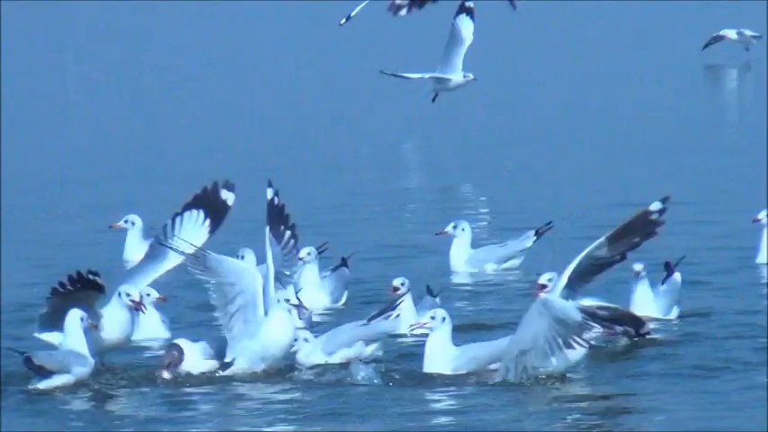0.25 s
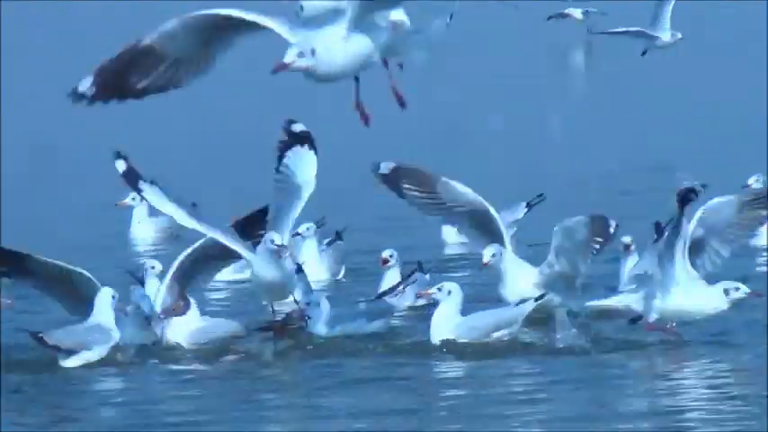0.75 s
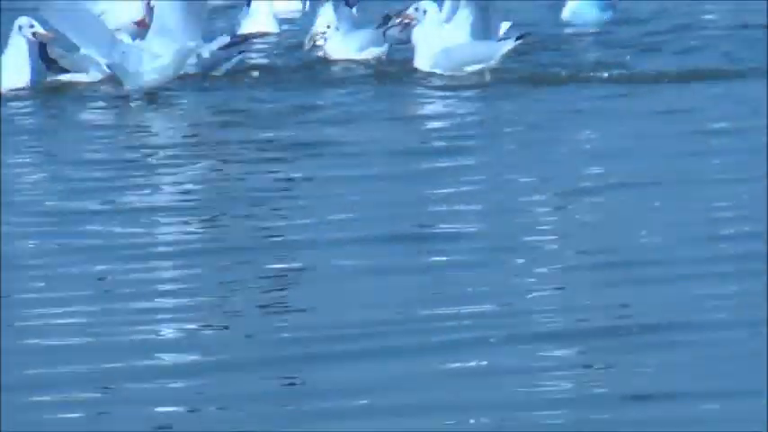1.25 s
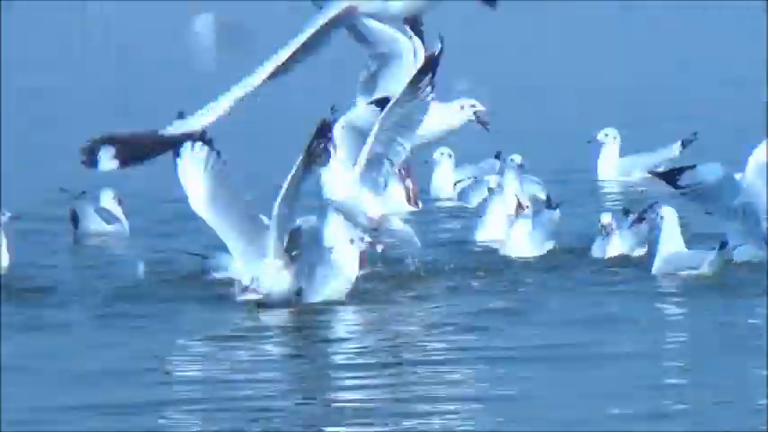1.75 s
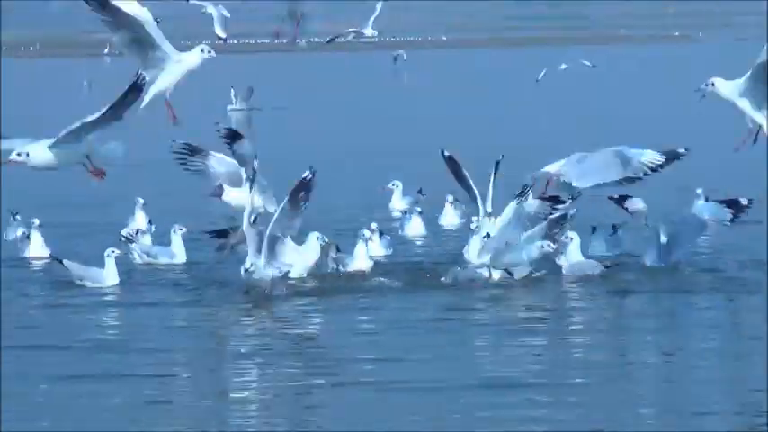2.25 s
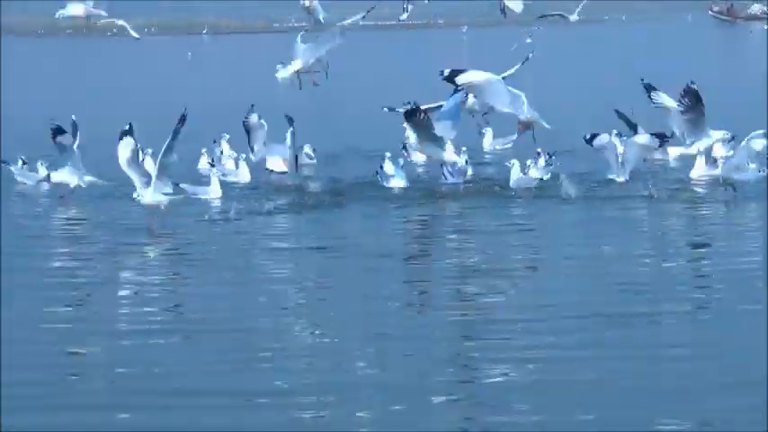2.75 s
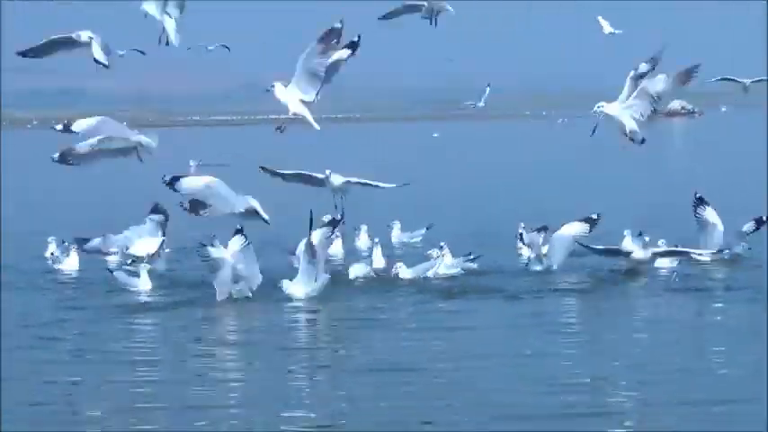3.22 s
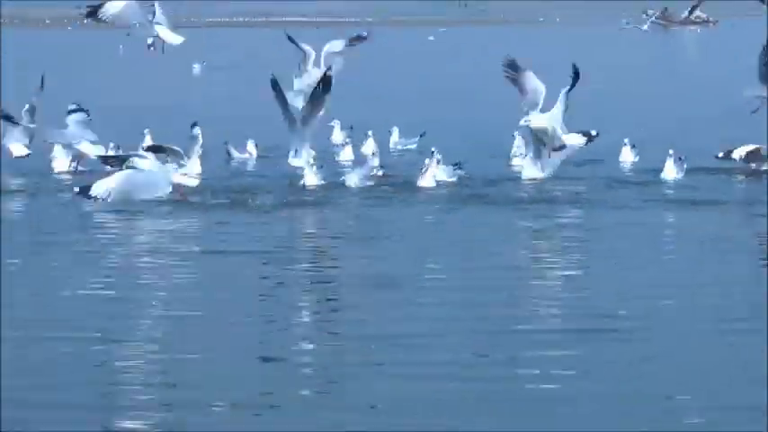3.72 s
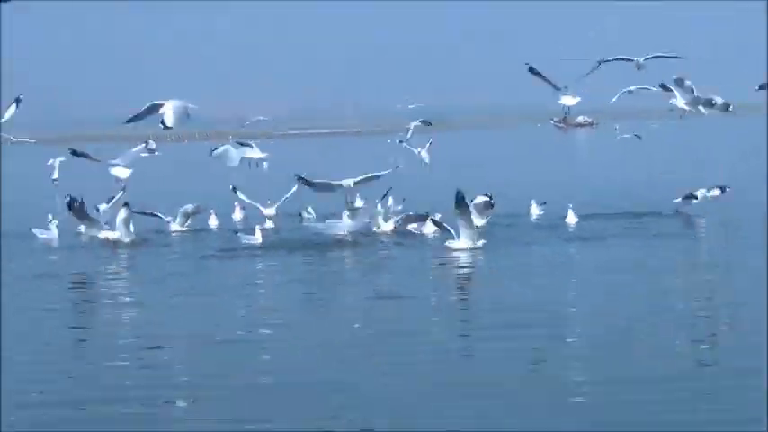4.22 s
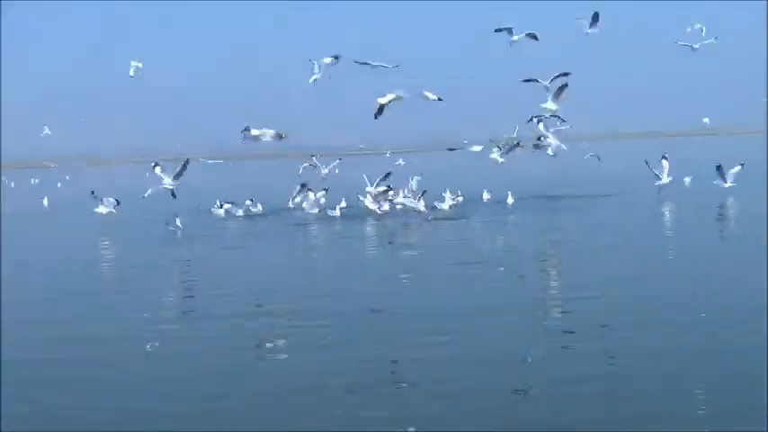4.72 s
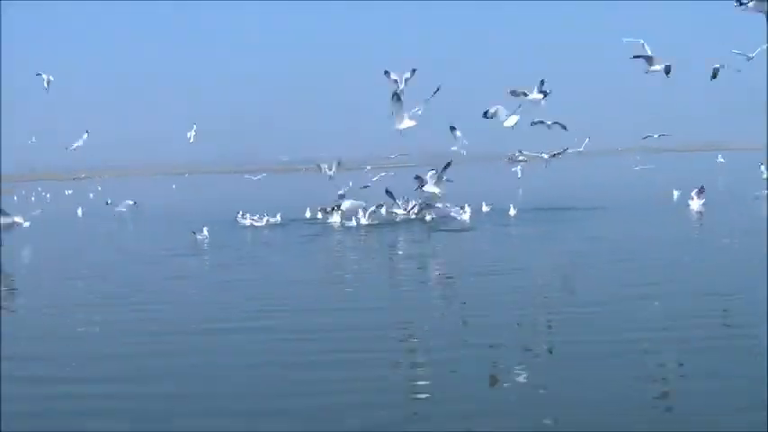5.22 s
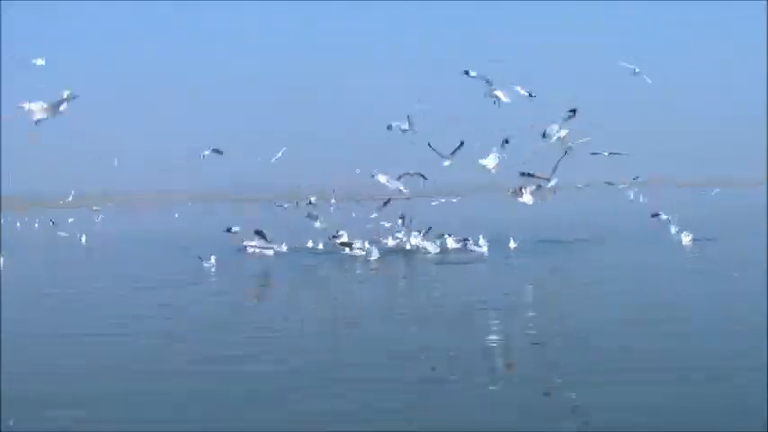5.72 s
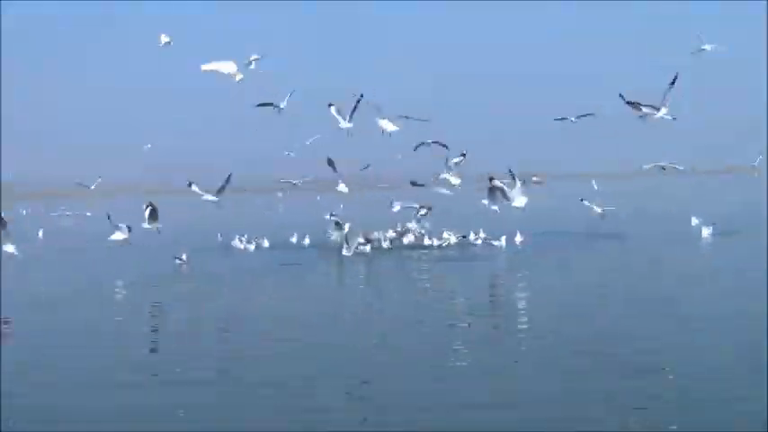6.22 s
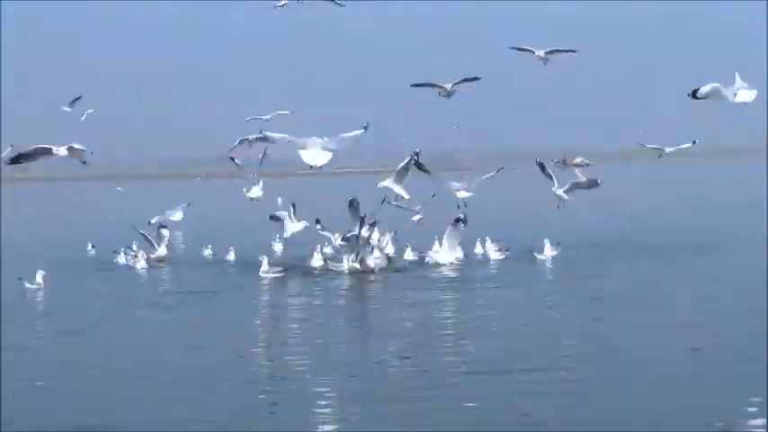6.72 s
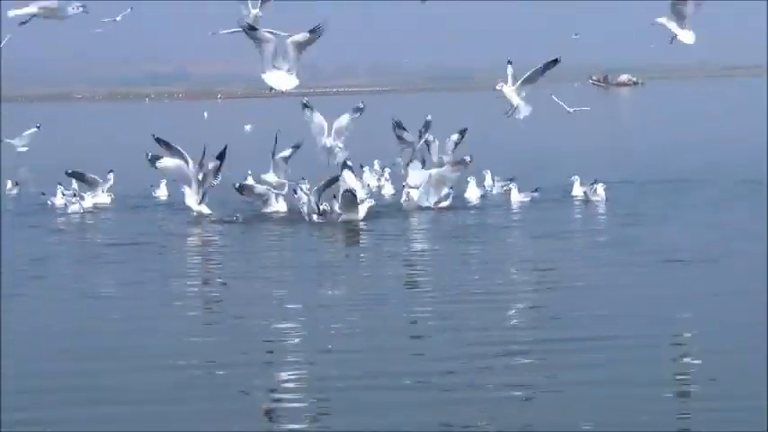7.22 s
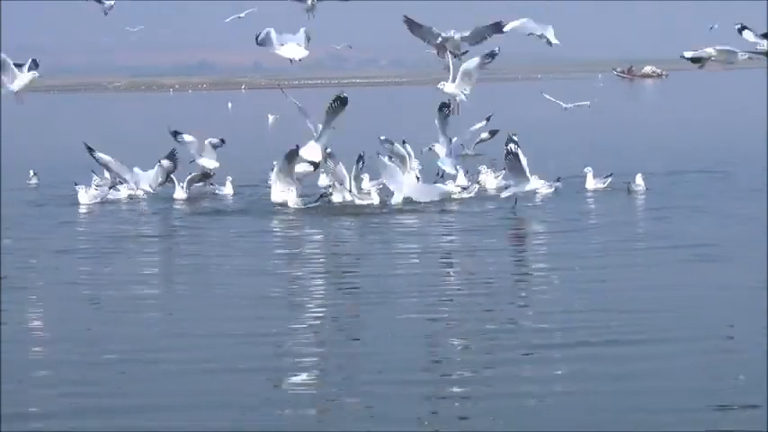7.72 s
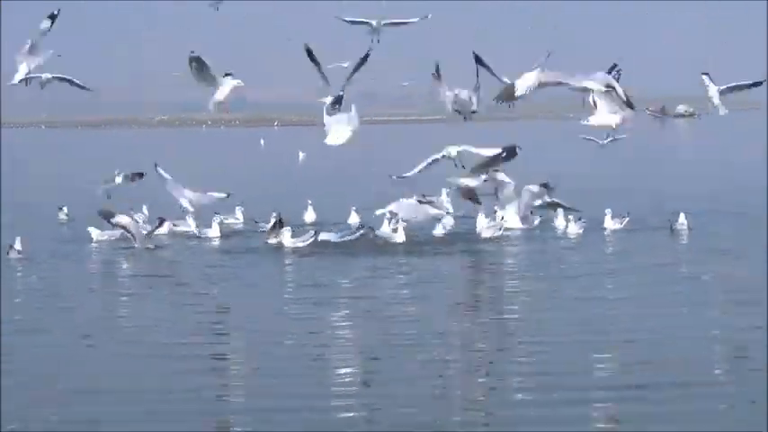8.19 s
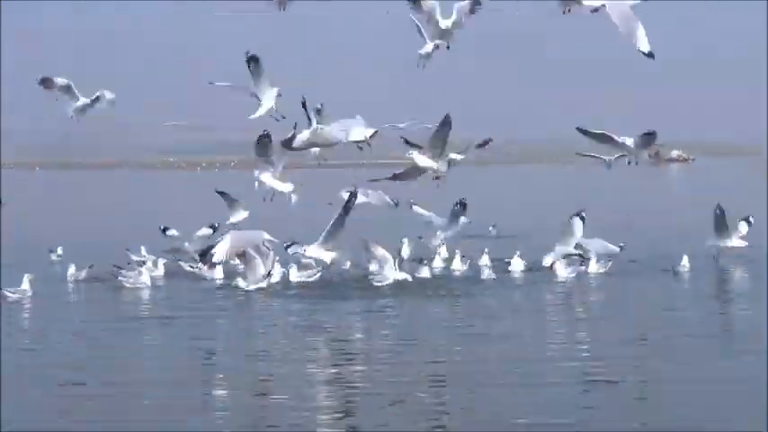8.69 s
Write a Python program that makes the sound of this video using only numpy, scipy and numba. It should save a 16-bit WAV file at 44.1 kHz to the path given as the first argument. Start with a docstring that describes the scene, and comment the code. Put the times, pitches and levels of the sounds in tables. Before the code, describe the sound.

Silence until about 0.65 s, then everything cuts in at once: a dense flock of gulls quarrelling over calm open water, close to a small stereo microphone. Short, harsh, nasal cries with a fast rattling trill follow one another several times a second, spread slightly left and right, over throaty low babble and a murmur of farther birds. Clearer squeals stand out at 1.45-1.65 s, 2.3 s, 2.7-3 s, 5.15-5.4 s, 7.8-8 s and 8.5 s. Tiny lulls break the clamour, notably near 1.25, 2.1, 3.6 and 8.9 s; single birds surface briefly at 1.7, 3.5 and 7.0-7.2 s. Beneath lies a soft, gently fluctuating water wash, slightly fuller around 6.3 s, with faint droplet ticks at 0.7, 1.9, 3.7, 5.5 and about 7 s. A very short echo off the water and a faint, very high steady whine remain. The chatter continues to the end, near 9 s.

```python
"""A flock of gulls squabbles over calm open water, close to a small stereo microphone.
Each voice is a train of pulses ringing the windpipe, beak and throat, chopped into a trill.
Some birds squeal clean notes, built from sine partials; a short echo comes back off the flat water.
Ticks of droplets, a wash of noise bands and a faint electric whine lie underneath.
Everything is switched on together after a short silence."""
import sys
import numpy as np
from scipy import signal
from scipy.io import wavfile
from scipy.ndimage import uniform_filter1d
from numba import njit

SR = 44100
rng = np.random.default_rng(int(sys.argv[2]) if len(sys.argv) > 2 else 0)


def store_wav(level_fs):
    """Save 16-bit WAV to argv[1]."""
    pcm = np.round(np.clip(np.atleast_2d(level_fs), -1, 1) * 32767)
    wavfile.write(sys.argv[1], SR, pcm.T.astype(np.int16))


def boost(x):
    """Linear amplitude factor 10**(x/20) for a level x in decibels (scalar or array-like)."""
    u = np.asarray(x, float) / 20
    return 10 ** u


N = 394694
T = np.arange(N) / SR  # seconds

# Cries that stand out of the flock. Each row: start in seconds, length in seconds,
# level in dB before the swell, beak resonance in Hz before it opens, treble in dB against the beak.
CRY_EVENTS = [(0.656, 0.073, -22, 2300, -5.5), (0.761, 0.12, -19.5, 2157, -15),
              (0.965, 0.064, -18.5, 2800, -15), (1.018, 0.12, -15, 2637, -17),
              (1.134, 0.063, -19.5, 2377, -17), (1.188, 0.05, -23, 2698, -11.5),
              (1.347, 0.15, -18, 2554, -16.5), (1.472, 0.25, -20.5, 2446, -13),
              (1.702, 0.11, -15, 2680, -15.5), (1.815, 0.072, -22, 2724, -9.5),
              (1.942, 0.17, -17, 2567, -12), (2.149, .045, -24.5, 3065, -10),
              (2.195, 0.12, -19.5, 3116, -8), (2.303, .08, -14, 2460, -20.5),
              (2.386, 0.063, -22.5, 2628, -9.5), (2.51, 0.066, -28, 2428, -22),
              (2.579, 0.1, -24, 2661, -7.5), (2.678, 0.17, -17.5, 2303, -15.5),
              (2.888, .08, -25.5, 2600, -11.5), (2.974, 0.069, -16.5, 2205, -15.5),
              (3.042, 0.15, -18, 2320, -11), (3.189, 0.094, -19, 2344, -19),
              (3.313, 0.072, -19, 2740, -11.5), (3.381, 0.049, -19.5, 2325, -18.5),
              (3.439, 0.061, -25.5, 2510, -8), (3.51, 0.064, -25, 2700, -4.5),
              (3.701, 0.13, -22.5, 2624, -9.5), (3.871, 0.052, -18.5, 3007, -8.5),
              (3.919, 0.058, -24.5, 2637, -8.5), (3.985, 0.15, -18, 2899, -10),
              (4.137, 0.073, -24.5, 2427, -15), (4.203, 0.057, -19, 3186, -10.5),
              (4.325, 0.18, -18, 3100, -8.5), (4.512, 0.077, -19, 3156, -7.5),
              (4.639, 0.073, -19.5, 2631, -13), (4.744, 0.15, -20, 2866, -6.5),
              (4.889, 0.092, -25, 2933, -6.5), (5.01, 0.071, -23.5, 3115, -4),
              (5.111, 0.05, -19, 2614, -13), (5.162, 0.12, -25, 2554, -7), (5.374, 0.1, -22, 2450, -7),
              (5.469, 0.037, -24.5, 2867, -10.5), (5.536, .047, -25, 2636, -23.5),
              (5.582, 0.08, -23.5, 2485, -9), (5.668, 0.1, -18.5, 2554, -14), (5.769, .13, -21.5, 2300, -9),
              (5.91, .055, -18.5, 2436, -14), (6.025, 0.085, -18, 2472, -13.5),
              (6.137, .075, -21, 2670, -17.5), (6.211, .045, -26.5, 3020, -6.5),
              (6.253, 0.086, -24.5, 2394, -12.5), (6.34, 0.082, -21.5, 2638, -17),
              (6.49, 0.069, -20.5, 2357, -12.5), (6.565, .14, -21, 2818, -14), (6.757, .1, -19, 2458, -14),
              (6.86, 0.059, -21, 2603, -12), (6.923, 0.093, -19, 2385, -12.5),
              (7.033, 0.098, -18, 2905, -14.5), (7.148, 0.074, -18, 2789, -6),
              (7.348, 0.13, -17.5, 2770, -9), (7.53, .1, -24, 2498, -15), (7.698, 0.17, -19, 2626, -9),
              (7.947, 0.099, -18, 2675, -8.5), (8.042, 0.16, -21, 2897, -10),
              (8.194, 0.089, -18.5, 2737, -10.5), (8.32, .05, -29, 2402, -18.5),
              (8.391, 0.088, -20, 2900, -7.5), (8.465, 0.13, -18.5, 2429, -14),
              (8.593, 0.023, -22.5, 2798, -12), (8.664, .04, -25, 2896, -18),
              (8.711, .075, -25.5, 2283, -15.5), (8.789, 0.068, -22.5, 2510, -11)]
# Moments when the whole flock falls quiet. Each row: start in seconds, length in seconds,
# depth in dB for the beak sound.
LULL_EVENTS = [(0.902, 0.028, -22), (1.245, 0.11, -9), (1.883, 0.033, -1), (2.089, 0.07, -12),
               (2.445, 0.069, -10), (2.918, 0.062, -3), (3.598, 0.088, -16), (4.265, 0.053, -6.5),
               (4.519, 0.083, -4.5), (5.967, 0.057, -3.5), (7.489, 0.037, -8), (7.881, 0.067, -3.5),
               (8.291, .03, -1), (8.37, .02, -6), (8.619, 0.058, -4), (8.92, 0.036, -25)]
# Stretches where one bird is heard nearly alone. Each row: start in seconds, length in seconds.
SOLO_STRETCHES = [(1.192, .051), (1.703, 0.11), (3.51, 0.059), (4.205, 0.057), (4.514, 0.064), (4.64, .04),
                  (5.535, .047), (7.034, 0.2), (8.039, .12), (8.32, 0.049), (8.665, .04)]
# Upper throat resonances. Each row: centre in Hz before the gape, width in Hz, gain in dB before flicker.
THROAT_RESONANCES = [(5680, 1340, 13.5), (8560, 2470, 7), (10860, 4500, 5)]
# Windpipe resonances. Each row: centre in Hz before it moves, width in Hz, gain in dB.
WINDPIPE_RESONANCES = [(495.5, 40, -8), (734, 794, -3.5), (1458, 264, 5)]
# Low babble from the windpipes. Each row: time in seconds, base level in dB.
BABBLE_CURVE = [(.65, -21.5), (1.1, -30), (2.4, -25.5), (2.7, -27), (3.5, -24), (4.8, -26.5), (5.73, -23.5),
                (7.4, -24.5), (8.95, -27.5)]
# Clean squeals, one list of points a call. Each row: time in seconds, second partial in Hz,
# its level in dB, fourth partial level in dB.
SQUEAL_CALLS = [
    [(1.44, 2405, -22, -38), (1.478, 2544, -15, -24), (1.54, 2557, -18, -34), (1.67, 2410, -25, -43)],
    [(2.7, 2390, -33, -53), (2.726, 2572, -21, -29), (2.75, 2680, -19.5, -26), (2.78, 2620, -19, -27),
     (2.83, 2694, -18, -25), (2.89, 2566, -17.5, -31), (2.938, 2484, -16, -32), (2.95, 2700, -15, -41)],
    [(5.14, 2636, -18, -42.5), (5.17, 2580, -28, -31.5), (5.26, 2522, -17.5, -28), (5.368, 2635, -16, -44),
     (5.39, 2506, -38.5, -59.5)],
    [(7.8, 2505, -28, -45), (7.932, 2450, -19, -40.5), (7.95, 2393, -17, -48), (7.98, 2420, -17, -40)],
    [(2.3, 2078, -19, -47), (2.34, 2218, -23, -23), (2.43, 2090, -25, -40)],
    [(8.46, 2019, -29, -42.5), (8.576, 2063, -18.5, -37), (8.6, 1865, -38, -46)],
    [(2.93, 1960, -21, -37), (2.955, 1825, -21, -28), (2.985, 1562, -24, -34)],
]
# Other partials of a squeal. Each row: multiple of the pitch,
# level in dB against the second partial (up to the third) or against the fourth (above it).
SQUEAL_PARTIALS = [(1, -24), (3, -17.5), (5, -12.5), (6, -10.5), (7, -13)]
# Droplets thrown by wings and feet. Each row: time in seconds, strike level in dB before filtering.
DROPLET_HITS = [(.695, -12), (1.9014, -20), (3.6622, -17), (5.498, -22), (6.8969, -18), (6.941, -14),
                (7.2568, -19)]
# Tone of the water wash. Each row: frequency in Hz, relative density in dB per Hz.
WATER_TONE = [(15, -52), (25, -16.5), (340, -0.5), (421, 0), (1110, -6.5), (1410, -1), (1800, -5.5),
              (2560, -7), (6380, -55), (9550, -18.5), (15500, -32)]
# Slow rise and fall of the wash. Each row: time in seconds, level change in dB.
WASH_CURVE = [(.65, 0.5), (1.5, -2.5), (3.5, 0.5), (4.6, -1.5), (6.3, 2), (7.7, 1), (8.95, -2.5)]

TRILL_HZ = 53.84  # average; each voice wanders around it
BEAK_MULTIPLE, PULSE_SPREAD = 6.1, .08  # the beak is tuned near this multiple of the pulse rate
# the murmur of farther birds between cries: level, beak resonance, treble, share of other voices
MURMUR_DB, MURMUR_BEAK_HZ, MURMUR_TREBLE_DB, MURMUR_CROWD = -29, 2450, -9.5, .75
CROWD, CROWD_SPREAD, SOLO_CROWD = .74, .05, .25  # share of other voices in a cry and in a solo
EDGE_S = .016  # rise and fall of a cry or a lull
SWELL_DB = 4.5  # rise inside a cry
CHATTER_DB, RASP_DB = 1.8, 1.5  # unevenness of babble and of treble
BEAK_WANDER, THROAT_FLICKER_DB = .055, 3.5
DROP_HZ, DROP_WIDTH_HZ, DROP_DECAY_S = 8400, 5100, 0.0022
WATER_DB = -30  # before the wash curve
WHINE_HZ = 15625
START_S, FADE_S = .652, 0.013


def flock(count=2):
    """A leading voice sings each cry on an arched pitch while others cut across it."""
    table, lulls = np.array(CRY_EVENTS), np.array(LULL_EVENTS)
    lull, quiet, _ = during(lulls)
    hush_db = soften(quiet * lulls[lull, 2])
    row, crying, through = during(table)
    arch = np.sin(np.pi * through)
    murmur = (MURMUR_DB, MURMUR_BEAK_HZ, MURMUR_TREBLE_DB)
    db, beak_hz, treble_db = (soften(np.where(crying, c[row], rest))
                              for c, rest in zip(table.T[2:], murmur))

    # every cry draws its own pitch, place and gape
    chance = rng.standard_normal((len(table), count + 1, 3))[row]
    hz = beak_hz / BEAK_MULTIPLE * soften(1 + PULSE_SPREAD * np.tanh(chance[:, count, 0]))
    crowd = soften(np.where(crying, CROWD + CROWD_SPREAD * chance[:, count, 2], MURMUR_CROWD))
    solo = soften(1. * during(np.array(SOLO_STRETCHES))[1])
    crowd = np.clip(crowd + solo * (SOLO_CROWD - crowd), .25, .95)

    # bright cries with few other voices rattle the most
    depth = (treble_db + 14) / 6 * (1.6 - crowd)
    lead_hz = hz * (.93 + .1 * arch ** .6)
    lead = syrinx(lead_hz, depth, jitter=.003 + .02 * crowd, scatter_db=1.5, breath=.1)
    voices = [np.sqrt(1 - crowd) * lead]
    for k in range(count):
        other_hz = 440 * (1 + .13 * np.tanh(chance[:, k, 0])) * (1 + .05 * walk(18))
        other = syrinx(other_hz, .8, jitter=.02, scatter_db=3, breath=.2)
        voices.append(crowd * other * boost(6 * walk(16)))

    beaks = treble = pipes = 0
    for k, voice in enumerate(voices):
        is_other = k > 0
        pan_db = 0.64 + 2.3 * uniform_filter1d(chance[:, k, 1], size=400)
        gape_spread = .02 + .04 * is_other
        gape = 1 + uniform_filter1d(gape_spread * np.tanh(chance[:, k, 2]), size=400)
        beaks = beaks + place(beak(voice, beak_hz, gape, arch, is_other), pan_db)
        treble = treble + place(throat(voice, gape), pan_db) * boost(-4 * is_other)
        pipes = pipes + place(windpipe(voice, arch), pan_db) * boost(-5 * (not is_other))

    # effort swells inside a cry
    swell = boost(db - 2.82 * soften(1. * crying) + SWELL_DB * arch)
    rasp = boost(treble_db + 0.76 * hush_db + RASP_DB * walk(12))
    cries = swell * (boost(hush_db) * even(beaks) + rasp * even(treble))
    # the babble follows the cries more weakly and the lulls more deeply
    babble_db = columns(BABBLE_CURVE)[0] + 0.58 * (db + 22) + 1.9 * hush_db
    return cries + even(pipes) * boost(babble_db + CHATTER_DB * walk(11))


def syrinx(hz, depth, jitter, scatter_db, breath):
    """Uneven pulses with a puff of air after each, shut off briefly at the trill rate."""
    trill = np.cumsum(TRILL_HZ * (1 + .12 * walk(8))) / SR
    beat = np.cos(2 * np.pi * trill)
    depth = np.clip(depth, 0, 1)
    # the pitch arches inside every trill beat
    phase = np.cumsum(hz * (1 - .035 * depth * beat + jitter * walk(400))) / SR
    at = np.flatnonzero(np.diff(np.floor(phase)))
    # split each pulse over two samples so it lands between them
    late = np.clip((phase[at + 1] % 1) / (phase[at + 1] - phase[at]), 0, 1)
    size = boost(scatter_db * rng.standard_normal(N))[at]
    pulses = np.zeros(N + 1)
    pulses[at] += size * late
    pulses[at + 1] += size * (1 - late)
    air = np.exp(-(phase % 1) / 0.45) * rng.standard_normal(N)
    gate = 1 - depth * np.clip(3 * beat - 1.6, 0, 1)
    return (unit(pulses[:N]) + breath * unit(air)) * gate


def beak(voice, hz, gape, arch, is_other):
    """Main beak resonance, opening and closing over a cry, with a weaker one above; others ring narrower."""
    opening = gape * (0.92 + 0.093 * arch + BEAK_WANDER * is_other * walk(20))
    main = ring(voice, hz * opening, 700 if is_other else 1400)
    return main + boost(-12) * ring(voice, 3600 * gape, 780)


def throat(voice, gape):
    """Upper throat resonances in alternating polarity, each flickering alone."""
    out = 0
    for j, (hz, width, db) in enumerate(THROAT_RESONANCES):
        level = boost(db + THROAT_FLICKER_DB * walk(14))
        out = out + (-1) ** j * level * ring(voice, hz * gape, width)
    return out


def windpipe(voice, arch):
    """Low tube resonances that rise with the arch of a cry and wander."""
    out = 0
    for hz, width, db in WINDPIPE_RESONANCES:
        out = out + boost(db) * ring(voice, hz * (0.937 + 0.061 * arch + 0.054 * walk(14)), width)
    return out


def squeals():
    """Clean held notes: harmonic sine partials, led by the even second and fourth."""
    out = 0
    for call in SQUEAL_CALLS:
        hz, db, high_db = columns(call)
        edge = np.clip(np.minimum(T - call[0][0], call[-1][0] - T) / .018, 0, 1)
        # the pitch is half the second partial
        phase = np.pi * np.cumsum(hz * (1 + .005 * walk(70))) / SR
        note = boost(db) * np.sin(2 * phase) + boost(high_db) * np.sin(4 * phase)
        for k, d in SQUEAL_PARTIALS:
            reference_db = db if k in (1, 3) else high_db
            note = note + boost(d + reference_db) * np.sin(k * phase)
        out = out + np.sqrt(2) * edge * note * boost(2.4 * walk(70))
    return place(out, np.array(.5))


def water_echo(gulls):
    """The flat water returns one short echo, a little later on one side."""
    left = np.roll(gulls[0], int(.0031 * SR))
    right = np.roll(gulls[1], int(0.0029 * SR))
    return boost(-21) * np.array([left, right])


def drops():
    """Short bright ticks of water: decaying noise bursts through one wide resonance."""
    s, db = np.transpose(DROPLET_HITS)
    hits = np.zeros(N)
    hits[(s * SR).astype(int)] = boost(db)
    decay = np.exp(-1 / (DROP_DECAY_S * SR))
    burst = signal.lfilter([1], [1, -decay], hits) * rng.standard_normal(N)
    return place(svf(burst, np.full(N, 1. * DROP_HZ), 1. * DROP_WIDTH_HZ), np.array(.3))


def water():
    """Half-octave bands of wash that flicker alone, nearly alike left and right."""
    out = 0
    hz_at, db_at = np.transpose(WATER_TONE)
    for hz in 30 * 2 ** np.arange(0, 9.1, .5):
        mid, side = (svf(rng.standard_normal(N), hz + np.zeros(N), hz / 3) for _ in range(2))
        db = np.interp(np.log(hz), np.log(hz_at), db_at) + 1.5 * walk(5)
        spread = np.interp(np.log(hz), np.log([30, 200, 1500]), [.12, .25, .12])
        out = out + boost(db) * (mid + spread * side * np.array([[1], [-1]]))
    return place(1, np.array(.9)) * unit(out) * boost(WATER_DB + columns(WASH_CURVE)[0])


def whine():
    """A faint, steady electric sine, the same on both sides."""
    return boost(-66) * np.sin(2 * np.pi * WHINE_HZ * T)


def unit(x):
    """Scale to rms 1."""
    return x / np.sqrt(np.mean(x ** 2))


def even(x):
    """Hold the level near rms 1 over a few trill beats."""
    return x / np.sqrt(uniform_filter1d(np.mean(x ** 2, 0), size=2400) + 1e-12)


def soften(x):
    """Smooth the steps of a control curve over one edge."""
    return uniform_filter1d(x, int(EDGE_S * SR))


def columns(table):
    """Every column of a curve, one value a sample."""
    s, *rest = np.transpose(table)
    return [np.interp(T, s, c) for c in rest]


def during(table):
    """For every sample: the latest event, whether it still lasts, and how far through it is."""
    row = np.clip(np.searchsorted(table[:, 0], T) - 1, 0, None)
    through = (T - table[row, 0]) / table[row, 1]
    return row, (through >= 0) & (through < 1), np.clip(through, 0, 1)


def walk(rate):
    """Random levels held 1 / rate s and slewed twice; spread near 1."""
    k = int(SR / rate)
    held = np.repeat(rng.standard_normal(N // k + 1), k)
    return 1.8 * uniform_filter1d(uniform_filter1d(held, k), k)[:N]


@njit
def svf(x, hz, width):
    """State-variable band-pass with a moving centre, gain 1 there."""
    y, b, l = np.empty(len(x)), 0., 0.
    for i in range(len(x)):
        g, k = np.tan(np.pi * hz[i] / SR), width / hz[i]
        v = (b + g * (x[i] - l)) / (1 + g * (g + k))
        b, l, y[i] = 2 * v - b, l + 2 * g * v, k * v
    return y


def ring(x, hz, width):
    """A steep resonance: the band-pass applied twice."""
    hz = hz + np.zeros(N)
    return svf(svf(x, hz, 1. * width), hz, 1. * width)


def place(x, pan_db):
    """Spread to left and right; positive pan_db leans left."""
    return x * boost(np.array([pan_db, -pan_db]).reshape(2, -1) / 2)


def scene():
    """All layers, switched on together."""
    gulls = flock() + squeals()
    mix = gulls + water_echo(gulls) + drops() + water() + whine()
    return mix * np.clip((T - START_S) / FADE_S, 0, 1)


def roll_off(x):
    """The treble ends steeply here."""
    return signal.sosfilt(signal.butter(12, 15920, fs=SR, output="sos"), x)


def record(dry):
    """The microphone housing dips near 430 Hz and the loudest peaks are rounded."""
    body = np.array([x - 0.9 * svf(x, np.full(N, 425.), 110.0) for x in dry])
    rounded = np.tanh(0.91 * body) / 0.69
    return roll_off(rounded)


dry = scene()
out = record(dry)
store_wav(out)
```